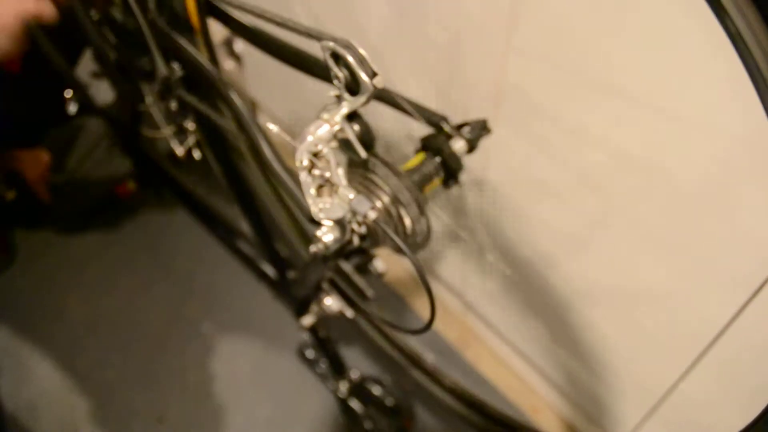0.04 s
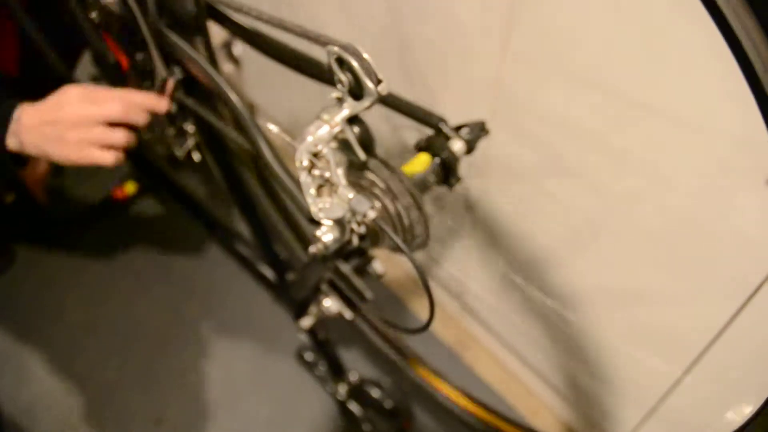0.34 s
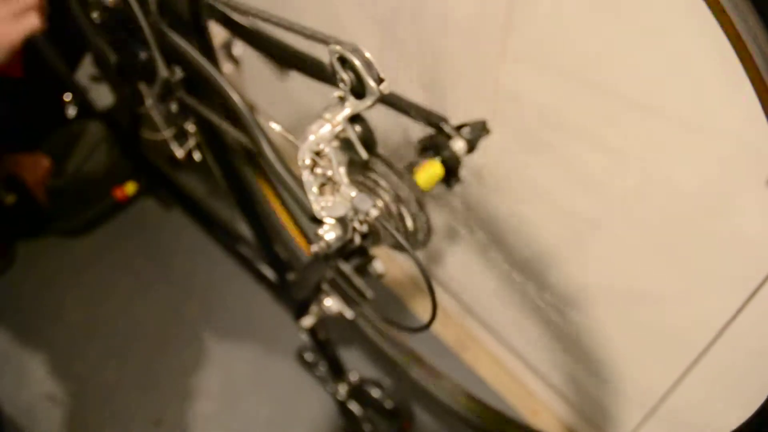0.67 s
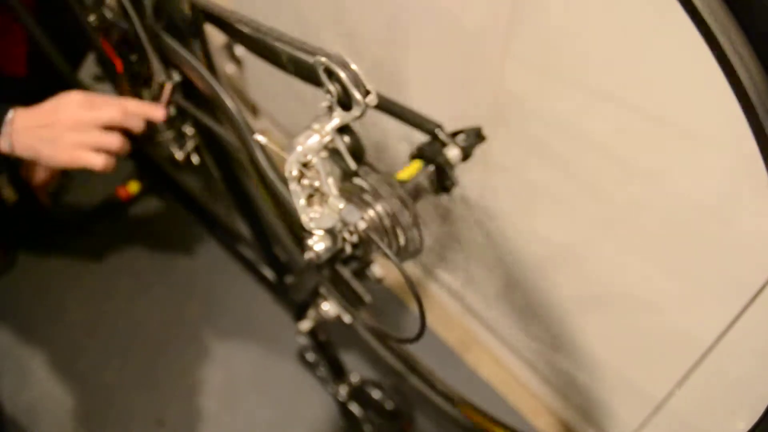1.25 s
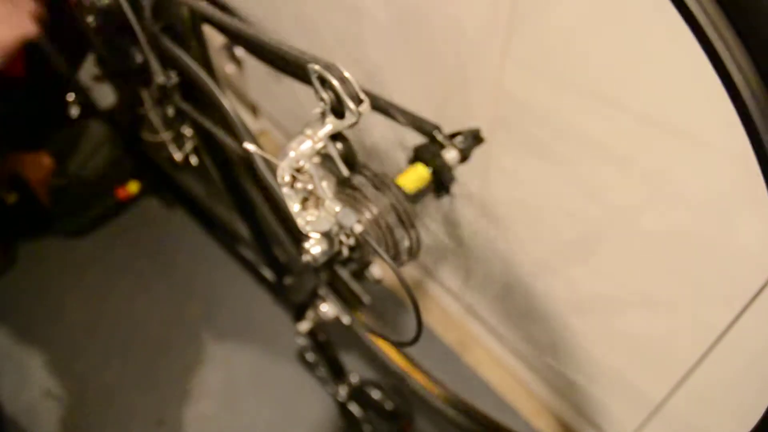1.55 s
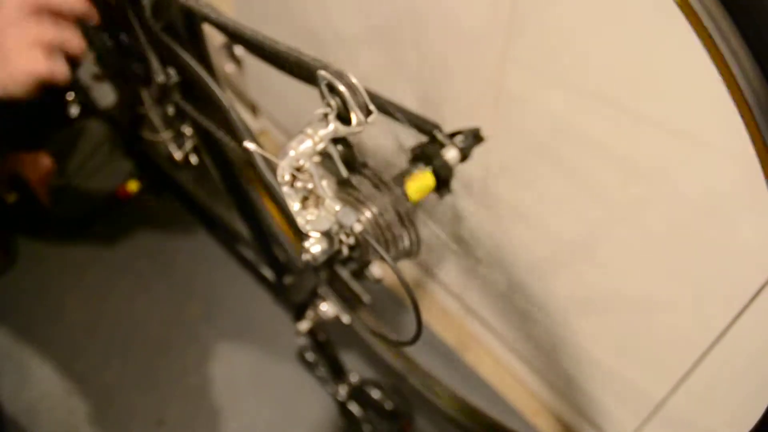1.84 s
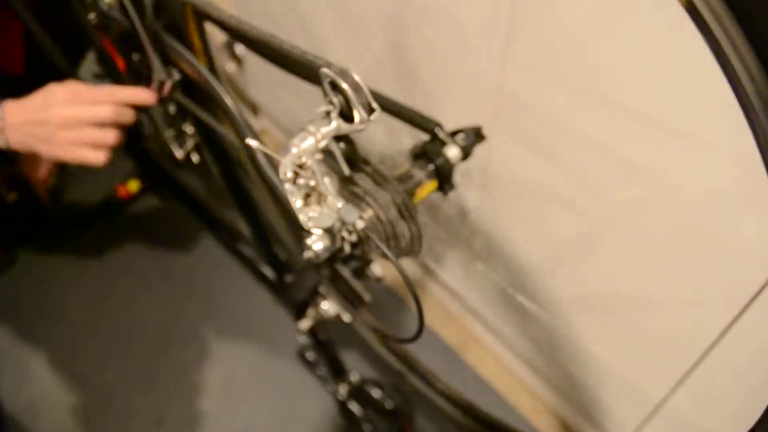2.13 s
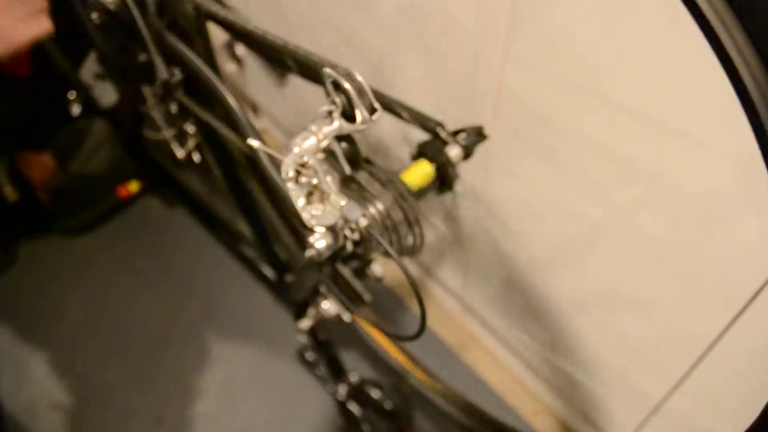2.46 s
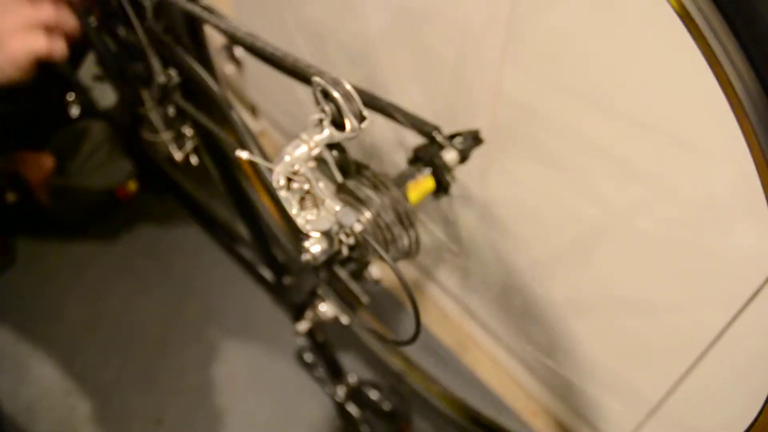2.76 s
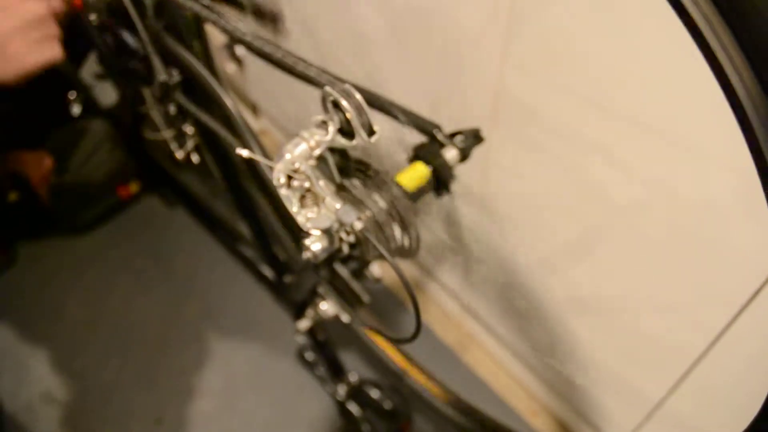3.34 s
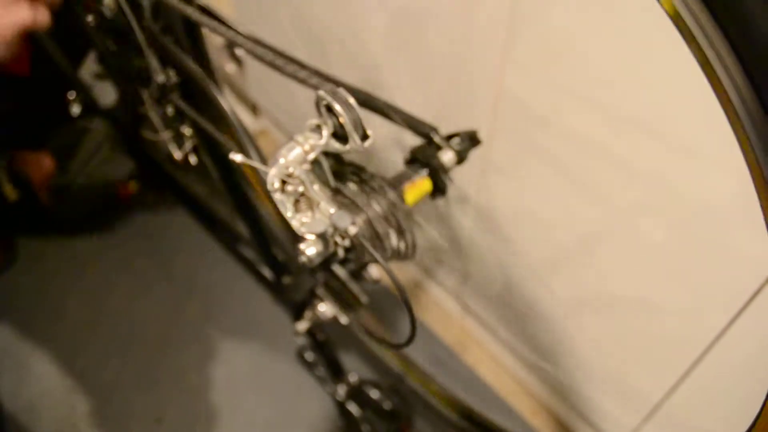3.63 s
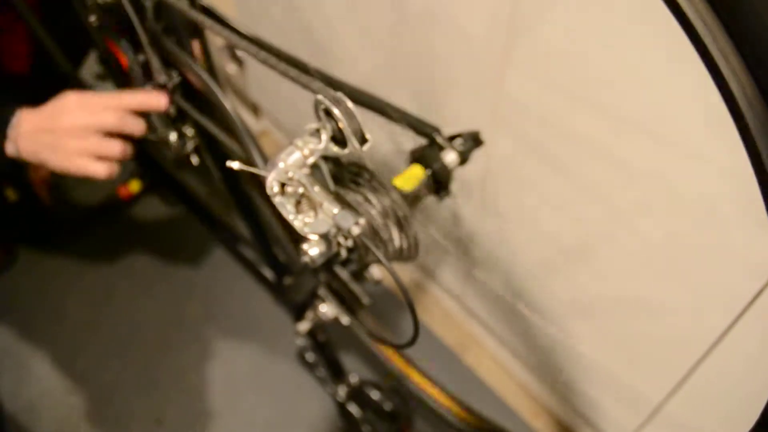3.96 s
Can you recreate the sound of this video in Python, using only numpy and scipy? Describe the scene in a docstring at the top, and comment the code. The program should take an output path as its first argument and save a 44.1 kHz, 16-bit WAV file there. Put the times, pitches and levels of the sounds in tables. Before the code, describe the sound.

Bicycle chain whirring and rattling through the gears, broken by metallic shifting clicks and clunks.

```python
"""A bicycle chain runs over its sprockets, cranked by hand on a repair stand in a small room.
Each link meets a tooth in a brief impact, about forty times a second, over a fine rattle of rollers.
The slack chain knocks on the frame and grazes the derailleur; the shift mechanism snaps, and the
chain drops onto a new sprocket, which rings in its natural modes. The resonances of frame and
sprockets colour all these sounds, and the room adds a short reverberation."""
import sys
import numpy as np
from scipy import signal
from scipy.fft import rfft, irfft, next_fast_len
from scipy.io import wavfile
from scipy.ndimage import uniform_filter1d

SR = 44100
rng = np.random.default_rng(int(sys.argv[2]) if len(sys.argv) > 2 else 0)


def digitize_waveform(pressure):
    """Quantize a signal to 16-bit integers and store it at the path in sys.argv[1].

    Rows of a 2-D input are taken as channels; values are limited to [-1, 1].
    """
    field = np.atleast_2d(pressure).T
    bounded = np.clip(field, -1, 1)
    quanta = np.round(bounded * 32767).astype(np.int16)
    wavfile.write(sys.argv[1], SR, quanta)


N = 176400
TIME = np.arange(N) / SR

# Travel of the chain: t/s, links passed
CHAIN_TRAVEL = [(0.0038, 0), (0.3543, 16), (0.6298, 28), (0.9891, 44), (1.1193, 50), (1.2551, 56),
                (1.6778, 74), (1.722, 76), (1.781, 79), (1.8285, 81), (1.998, 88), (2.403, 105),
                (2.5873, 113), (2.6872, 117), (2.7913, 121), (2.9635, 128), (3.1486, 135), (3.303, 141),
                (3.6559, 155), (3.9807, 168)]
# Force with which the links seat: t/s, level/dB (all levels in the tables are relative)
SEATING_FORCE = [(0, -26.5), (.08, -24.5), (.21, -26), (.26, -24), (.36, -24.5), (.43, -30), (.49, -25),
                 (.57, -27.5), (.67, -28), (.78, -25), (.92, -26), (1.1, -23.5), (1.28, -28.5), (1.59, -27),
                 (1.65, -28.5), (1.75, -24.5), (1.92, -28), (2.0, -25.5), (2.2, -28), (2.44, -27.5),
                 (2.52, -25.5), (2.68, -28.5), (2.8, -29), (2.97, -27), (3.13, -26), (3.22, -28),
                 (3.34, -25), (3.48, -27), (3.86, -26)]
# Links that catch and seat harder: t/s, added level/dB
CATCHING_LINKS = [(.493, 4.5), (.989, 5), (1.255, 3), (1.328, 3), (1.998, 3), (2.021, 3), (2.094, 3),
                  (2.189, 4), (2.237, 4), (2.26, 3), (2.518, 3), (2.589, 3), (2.612, 3), (2.866, 4),
                  (3.857, 2)]
# Gear in use: start t/s, roller f/Hz, ring time/s, ring level/dB, rattle level/dB, pulley level/dB
GEAR_STATES = [(0, 5950, .0028, -4, -45, -4), (1.2, 4950, .0011, 3, -47, -9),
               (2.45, 4850, .0011, 2.5, -47.5, -10), (3.05, 4950, .0011, 3, -51, -20)]
# Spectra of a link's tick, the rattle, a metal crunch, a graze and the background: f/Hz, level/dB
TICK_SPECTRUM = [(205, -28), (905, -23), (1810, -1.5), (2610, -3.5), (3610, 3.5), (4260, 1.5), (4960, 6),
                 (5510, -5.5), (6060, 5), (6710, 2.5), (7910, -12.5), (9510, -16.5), (11490, -36.5)]
RATTLE_SPECTRUM = [(31, -80), (121, -33), (382, -12.5), (955, -33), (1710, -2), (2610, 7.5), (3510, 13),
                   (5410, -13), (6710, 0), (7910, -5.5), (9510, -12), (11490, -40)]
CRUNCH_SPECTRUM = [(61, -28), (172, -15), (352, -7), (755, -7.5), (1510, -5), (2610, -4), (3610, 7),
                   (5410, 6.5), (6710, 9), (7910, 0.5), (9510, -3), (11490, -18.5)]
GRAZE_SPECTRUM = [(1000, -20), (4000, -19), (6700, 1), (8000, -1), (11000, -17)]
BACKGROUND_SPECTRUM = [(26, -32), (61, -14), (122, -8.5), (405, 6.5), (910, 5), (2010, 11.5), (9990, -49)]
# Bass, low middle, high middle and treble bands of an impact: lower f/Hz, upper f/Hz
IMPACT_BANDS = [(190, 550), (550, 1300), (1300, 2700), (2700, 11000)]
# Knocks of the slack chain on the frame: t/s, ring f/Hz, level/dB in each of the four bands
CHAIN_KNOCKS = [(0.134, 1760, -54, -51, -41, -42), (1.565, 1430, -46.5, -47, -37.5, -42),
                (1.69, 1700, -53, -56, -35.5, -33), (1.784, 1450, -47, -51, -39.5, -39.5),
                (1.855, 1800, -68, -67, -38, -48), (1.907, 1450, -70, -68, -36, -56),
                (3.02, 1400, -43, -55, -36, -33.5), (3.033, 1650, -45, -34, -27.5, -42),
                (3.087, 1600, -45, -60, -38, -37), (3.143, 1600, -53, -68, -55, -42),
                (3.203, 2150, -57, -70, -43, -36), (3.777, 1520, -66, -52, -31.5, -37)]
# Grazes of the chain on the derailleur: t/s, level/dB
PLATE_GRAZES = [(0.953, -34), (1.005, -30), (1.045, -39), (1.089, -30.5), (1.269, -35), (1.317, -32),
                (3.442, -26), (3.78, -28.5)]
# Snaps of the shift mechanism and chain drops: t/s, ring f/Hz, level/dB in each of the four bands
SHIFT_SNAPS = [(1.1415, 1760, -37, -31.5, -19.5, -25.5), (1.3925, 1630, -38, -31.5, -19.5, -15),
               (1.6697, 1590, -44, -46, -31, -25), (2.4607, 1910, -38, -33.5, -22, -25.5),
               (2.7196, 1530, -38.5, -31.5, -23, -14.5), (3.0018, 1525, -38.5, -45, -29, -23.5),
               (3.6492, 1780, -41.8, -33.5, -21.5, -25), (3.9062, 1530, -37, -34, -20, -15.5)]
# Landings of the chain on a new sprocket: t/s, hub level/dB, sprocket level/dB
CHAIN_LANDINGS = [(1.672, -47, -31), (3.005, -37, -41)]
# Modes of hub (below 1 kHz) and sprocket: f/Hz, level/dB, T60/s
HUB_SPROCKET_MODES = [(231, -1, .16), (440, -3, .09), (495, -2, .08), (3280, -1, .03), (3420, -7, .05),
                      (3610, 0, .055)]
# Resonances of the derailleur: f/Hz, bandwidth/Hz, level/dB
DERAILLEUR_MODES = [(1030, 70, -2), (2000, 80, -1), (2200, 80, 0), (2700, 70, -1), (3200, 80, -4),
                    (3560, 80, -4), (4390, 70, -3), (4850, 90, -2), (6020, 70, -3), (6720, 70, -5)]
# Resonances of frame and sprockets: f/Hz, bandwidth/Hz, level/dB
FRAME_MODES = [(175, 12, -9), (231, 14, -8), (358, 11, 0), (496, 11, -1), (1430, 60, -6), (1640, 120, -7),
               (1950, 100, -5), (3620, 300, -11.5), (6050, 350, -12), (6600, 250, -13)]


def from_db(db):
    """Amplitude ratio of a level: tenfold for every 20 dB."""
    return 10 ** (np.asarray(db) / 20)


def unit_rms(x):
    """Normalisation to a root mean square of one."""
    return x / np.sqrt(np.mean(x ** 2) + 1e-20)


def add(out, start_s, sound):
    """Superposition: a short sound is summed into the output from its starting time."""
    i = int(np.clip(start_s * SR, 0, N - 1))
    out[i:i + len(sound)] += sound[:N - i]


def held_decay(t, hold_s, decay_s):
    """Exponential damping that sets in after a time at full amplitude."""
    return np.exp(-np.maximum(t - hold_s, 0) / decay_s)


def burst(envelope, smoothing_hz=150):
    """Spectral whitening: noise under an envelope has its energy spread evenly over frequency."""
    noise = rng.standard_normal(len(envelope)) * envelope
    spectrum = rfft(noise)
    power = uniform_filter1d(np.abs(spectrum) ** 2, int(smoothing_hz * len(noise) / SR), mode="mirror")
    whitened = irfft(spectrum * np.sqrt(np.sum(envelope ** 2) / (power + 1e-20)), len(noise))
    return np.clip(whitened, -3 * envelope, 3 * envelope)


def coloured(x, spectrum):
    """Minimum-phase filtering to a given spectrum; white noise keeps its power."""
    size = next_fast_len(len(x) + 4096, True)
    size += size % 2
    hz, db = np.transpose(spectrum)
    bin_hz = np.fft.rfftfreq(size, 1 / SR)
    gain = unit_rms(from_db(np.interp(np.log(bin_hz + 1), np.log(hz), db)))
    cepstrum = irfft(np.log(gain))
    cepstrum[1:size // 2] *= 2  # folding onto positive time makes the filter causal
    cepstrum[size // 2 + 1:] = 0
    return irfft(rfft(x, size) * np.exp(rfft(cepstrum)))[:len(x)]


def resonate(x, modes):
    """Forced vibration: each resonance adds a narrow band of the driving sound to that sound."""
    return x + sum(from_db(db) * signal.lfilter(*signal.iirpeak(hz, hz / width, fs=SR), x)
                   for hz, width, db in modes)


def damped_mode(hz, db, t60, attack_s=.002):
    """Free vibration of one mode: a sinusoid that rises softly and decays exponentially."""
    t = TIME[:SR // 2]
    return np.minimum(t / attack_s, 1) * from_db(db - 60 * t / t60) * np.sin(2 * np.pi * hz * t)


def gear_at(time_s):
    """Step function of time: the roller, rattle and pulley settings of the gear in use."""
    gears = np.array(GEAR_STATES)
    return gears[np.searchsorted(gears[1:, 0], time_s), 1:].T


def roller_ring(t, hz, ring_s, attack_s=.002, rise_hz=330, scatter=.025):
    """Linear chirp under a Gaussian envelope: a seating roller rings briefly with rising pitch."""
    from_peak = t - attack_s
    centre_hz = hz * (1 + scatter * rng.normal())
    cycles = centre_hz * from_peak + rise_hz / ring_s * from_peak ** 2 / 2 + rng.random()
    envelope = np.minimum(t / attack_s, 1) * np.exp(-(from_peak / ring_s) ** 2)
    return envelope * np.sin(2 * np.pi * cycles)


def chain_links(tick_db=-3, lead_s=.0006, force_spread_db=1, colour_spread_db=2.5):
    """Impact train: each link ticks on a tooth, its roller rings, and a lighter pulley tick follows."""
    travel_s, passed = np.transpose(CHAIN_TRAVEL)
    times = np.interp(np.arange(passed[-1] + 1), passed, travel_s)
    force_db = np.interp(times, *np.transpose(SEATING_FORCE))
    force_db += force_spread_db * rng.normal(size=len(times))
    for at, db in CATCHING_LINKS:
        force_db[np.argmin(np.abs(times - at))] += db
    out, t = np.zeros(N), TIME[:SR // 25]
    tick = held_decay(t, hold_s=.0025, decay_s=.0014)
    shiver = from_db(-6.5) * held_decay(t, hold_s=.01, decay_s=.004)  # each tick holds for about 10 ms, then dies away quickly
    for at, gap_s, force in zip(times - lead_s, np.gradient(times), from_db(force_db)):
        roller_hz, ring_s, ring_db, _, pulley_db = gear_at(at)
        spectrum = [(hz, db + colour_spread_db * rng.normal()) for hz, db in TICK_SPECTRUM]
        tooth_tick = coloured(burst(np.maximum(tick, shiver)), spectrum)
        add(out, at, force * from_db(tick_db) * tooth_tick)
        pulley_lag_s = gap_s * rng.uniform(.45, .62)
        pulley_tick = coloured(burst(tick), spectrum)
        add(out, at + pulley_lag_s, force * from_db(tick_db + pulley_db) * pulley_tick)
        add(out, at, force * from_db(ring_db) * roller_ring(t, roller_hz, ring_s))
    return out


def roller_rattle(clicks_per_s=2500, spread_db=4, swell_db=3.5):
    """Shot noise: rollers and plates jostle through the derailleur in dense, random, tiny clicks."""
    sizes = from_db(spread_db * np.minimum(rng.exponential(1, N), 4))
    signs = rng.choice([-1, 1], N)
    clicks = sizes * signs * (rng.random(N) < clicks_per_s / SR)
    swell = unit_rms(signal.sosfilt(signal.butter(2, 25, fs=SR, output="sos"), rng.standard_normal(N)))
    rattle_db = gear_at(TIME)[3]
    return unit_rms(coloured(clicks, RATTLE_SPECTRUM)) * from_db(rattle_db + swell_db * swell)


def background(level_db=-53):
    """Stationary filtered noise: a faint, steady hiss."""
    return from_db(level_db) * coloured(rng.standard_normal(N), BACKGROUND_SPECTRUM)


def metal_impact(envelope, ring_hz, band_dbs, ring_width_hz=90, ring_db=2.5, spread_db=2.5):
    """Modal excitation: a crunch of metal contacts rings the derailleur, differently each time."""
    modes = [(hz, width, db + spread_db * rng.normal()) for hz, width, db in DERAILLEUR_MODES]
    modes.append((ring_hz, ring_width_hz, ring_db))
    crunch = resonate(coloured(burst(envelope), CRUNCH_SPECTRUM), modes)
    out = 0
    for edges_hz, db in zip(IMPACT_BANDS, band_dbs):
        band = signal.sosfilt(signal.butter(2, edges_hz, "band", fs=SR, output="sos"), crunch)
        band_rms = np.sqrt(np.sum(band ** 2) / (.02 * SR))  # as if its energy lay within 20 ms
        out = from_db(db) * band / band_rms - out  # alternating signs avoid notches between bands
    return out


def chain_knocks(attack_s=.0026, decay_s=.0085):
    """Soft impact: the slack chain slaps the frame with a force that builds, then decays."""
    out, t = np.zeros(N), TIME[:SR // 10]
    envelope = np.minimum(t / attack_s, 1) * np.exp(-t / decay_s)
    for at, ring_hz, *band_dbs in CHAIN_KNOCKS:
        add(out, at, metal_impact(envelope, ring_hz, band_dbs))
    return out


def low_bump(start_s=.298):
    """Damped oscillation of a single low mode, heard as one soft bump."""
    out = np.zeros(N)
    add(out, start_s, damped_mode(hz=173, db=-48.5, t60=.09))
    return out


def plate_grazes(decay_s=.003):
    """Glancing contact: side plates graze the derailleur in thin, bright ticks of noise."""
    out = np.zeros(N)
    envelope = np.exp(-TIME[:SR // 20] / decay_s)
    for at, db in PLATE_GRAZES:
        add(out, at, from_db(db) * burst(envelope))
    return coloured(out, GRAZE_SPECTRUM)


def shift_snaps(gain_db=-2, play_s=.003, play_db=-9, hold_s=.0025, decay_s=.0036):
    """Backlash: the shift mechanism quietly takes up its play, then strikes home."""
    out, t = np.zeros(N), TIME[:SR // 10]
    envelope = np.where(t < play_s, from_db(play_db), held_decay(t, play_s + hold_s, decay_s))
    for at, ring_hz, *band_dbs in SHIFT_SNAPS:
        add(out, at, metal_impact(envelope, ring_hz, band_dbs))
    return from_db(gain_db) * out


def chain_landings():
    """Free vibration after impact: the sprocket pings and the hub rings low as the chain drops on."""
    out = np.zeros(N)
    for at, hub_db, sprocket_db in CHAIN_LANDINGS:
        for hz, db, t60 in HUB_SPROCKET_MODES:
            strike_db = hub_db if hz < 1000 else sprocket_db
            add(out, at, damped_mode(hz, db + strike_db, t60))
    return out


def room(direct, delay_s=.0027, early_db=-11.5, early_t60_s=.047, late_db=-5.7, late_t60_s=.53):
    """Reverberation by convolution: quick reflections from floor and wheel, and a diffuse tail."""
    t, response = TIME[:SR // 2], 0
    for db, t60 in ((early_db, early_t60_s), (late_db, late_t60_s)):
        tail = burst(from_db(-60 * t / t60) * (t > delay_s))
        response = response + from_db(db) * tail / np.sqrt(np.sum(tail ** 2))
    return direct + signal.fftconvolve(direct, response)[:N]


def scene():
    """Source and filter: the drivetrain excites the frame and sounds in the room, over a faint hiss."""
    running_chain = chain_links() + roller_rattle()
    impacts = shift_snaps() + chain_knocks() + chain_landings() + low_bump() + plate_grazes()
    bicycle = from_db(-5.5) * resonate(running_chain + impacts, FRAME_MODES)
    return (room(bicycle) + background())[None]


def record(dry, cutoff_hz=11550):
    """Band limiting: an elliptic low-pass filter cuts the highest treble steeply."""
    return signal.sosfilt(signal.ellip(10, .2, 70, cutoff_hz, fs=SR, output="sos"), dry)


dry = scene()
out = record(dry)
digitize_waveform(out)
```